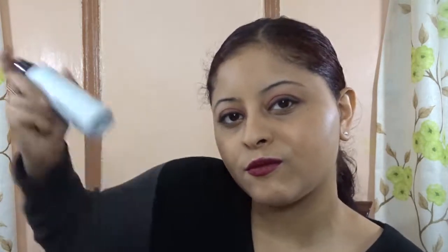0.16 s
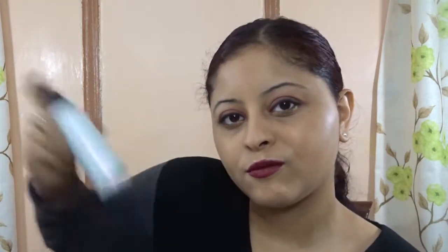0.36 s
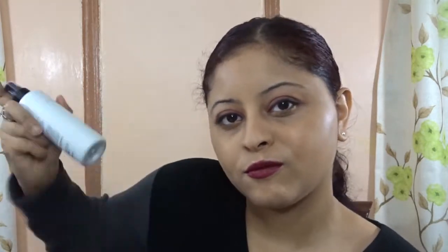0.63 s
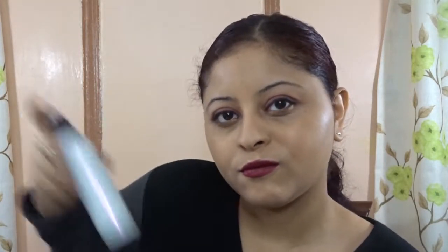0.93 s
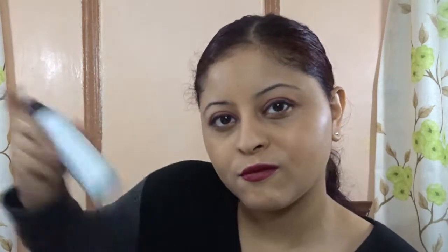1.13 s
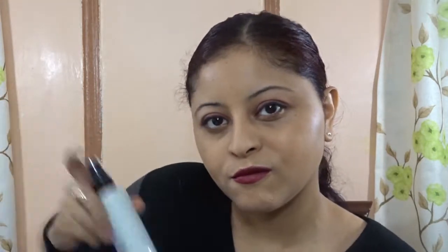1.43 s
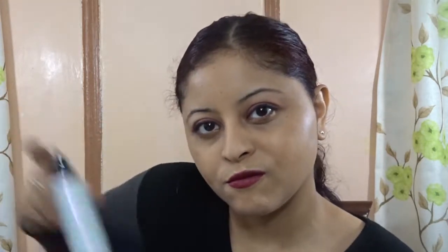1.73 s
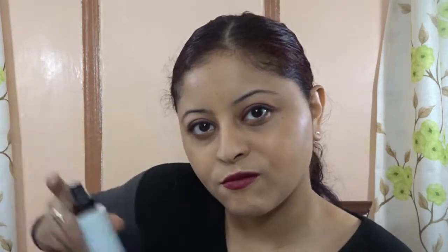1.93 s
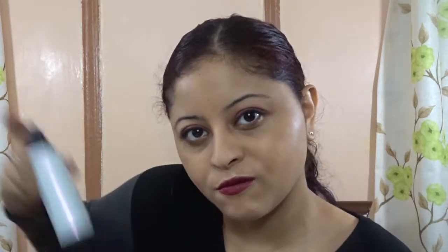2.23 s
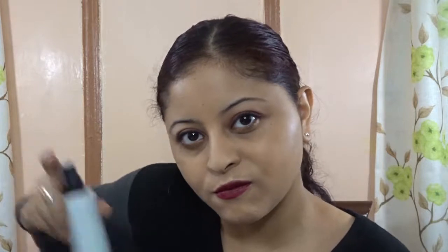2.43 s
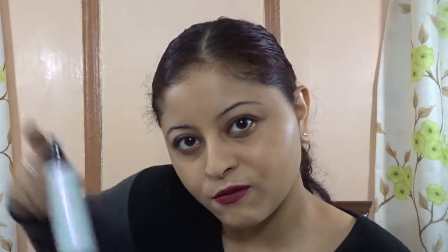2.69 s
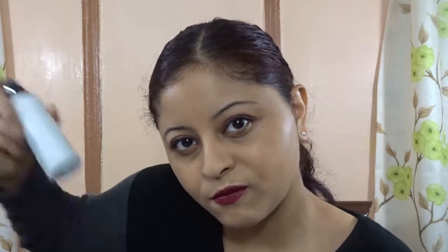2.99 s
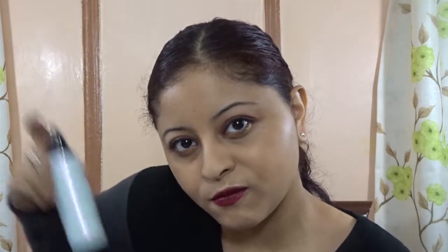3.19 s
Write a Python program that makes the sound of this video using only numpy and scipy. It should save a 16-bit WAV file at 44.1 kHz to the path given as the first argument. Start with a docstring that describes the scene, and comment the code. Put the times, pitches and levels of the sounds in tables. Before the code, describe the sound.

A plastic bottle is shaken hard from 0 to about 3.3 seconds. Its mixing ball gives dry, hollow, bright clacks, little bass, with light ticking bounces between. Early knocks are irregular, with a strong one near 0.16; from about 1 second, pairs of strokes run at roughly eight knocks per second, with a brief thinner gap around 2.25-2.5. Close, loud stereo; small-room echoes over faint hum and hiss.

```python
"""A soft low hum and hiss fill the room from start to end: shaped noise whose level wanders in patches.
Over it a plastic spray bottle is shaken hard: its mixing ball knocks at each end of the stroke
and bounces lightly between. Every contact rings the short modes of the bottle, as fading sines.
Bright echoes from near hard surfaces follow each one, then the tail of a small room, made of noise.
Last, a fast limiter holds the highest peaks and the top of the treble is rolled off."""
import sys
import numpy as np
from scipy import signal
from scipy.fft import rfft, irfft, next_fast_len
from scipy.io import wavfile
from scipy.ndimage import uniform_filter1d, minimum_filter1d

SR = 44100
rng = np.random.default_rng(int(sys.argv[2]) if len(sys.argv) > 2 else 0)


def to_wav(s):
    """Save 16-bit WAV."""
    ch = np.atleast_2d(s).T  # columns
    pcm = np.round(np.clip(ch, -1, 1) * 32767)  # PCM
    wavfile.write(sys.argv[1], SR, pcm.astype(np.int16))


N = 147735
SIZE = 16384  # samples in the transform of one knock
RING_SIZE = SIZE // 8  # samples of ringing
TAIL_SIZE = SIZE - RING_SIZE  # samples of room tail


def amp(db):
    """Turn decibels into a factor on the amplitude."""
    return 10 ** (np.asarray(db) / 20)


def along(points, hz):
    """Read a curve of (frequency [Hz], value) points on a log frequency axis."""
    point_hz, value = np.transpose(points)
    return np.interp(np.log(hz + 1), np.log(point_hz + 1), value)


def pair(mid, side, alike, hz):
    """Mix two unrelated spectra into a left and a right one that are as alike as asked."""
    turn = np.arccos(np.clip(along(alike, hz), -1, 1)) / 2
    shared = np.cos(turn) * mid
    opposed = np.sin(turn) * side
    return np.stack([shared + opposed, shared - opposed])


# Colour of the hum and hiss: (frequency [Hz], relative level [dB per Hz])
HUM_AND_HISS_COLOUR = [(25, -12), (44, -6), (80, -8.5), (140, 0.5), (190, -5.5), (400, -4), (1000, -13),
                       (2500, -14), (8000, -17), (16000, -30)]
# How alike the hum and hiss are left and right: (frequency [Hz], likeness [1 = the same])
HUM_AND_HISS_ALIKE = [(100, 1), (400, 0.7), (4000, 0.069)]
HUM_AND_HISS_DB, PATCHY_DB = -50, 1.5  # overall RMS level; spread of the patches


def hum_and_hiss():
    """Steady noise of the room: coloured noise whose level wanders in patches of time and pitch."""
    size = next_fast_len(N)
    hz = np.fft.rfftfreq(size, 1 / SR)
    grid = signal.stft(rng.standard_normal((2, size + SIZE)), nperseg=2048)[2]
    patches = rng.standard_normal(grid.shape[1:])
    patches = uniform_filter1d(patches, size=3, axis=0)  # smooth over pitch
    patches = uniform_filter1d(patches, size=9, axis=1)  # smooth over time
    patchy = signal.istft(grid * amp(PATCHY_DB * patches / patches.std()), nperseg=2048)[1]
    mid, side = rfft(patchy[:, :size]) * amp(along(HUM_AND_HISS_COLOUR, hz))
    noise = irfft(pair(mid, side, HUM_AND_HISS_ALIKE, hz), size)[:, :N]
    return amp(HUM_AND_HISS_DB) * noise / np.sqrt(np.mean(noise ** 2))


# Hard knocks of the ball, and how strongly each drives the groups of bottle modes:
# (time [s], body pitch [Hz], body level [dB], wall level [dB], neck level [dB],
#  click level [dB], base level [dB])
KNOCKS = [(.0055, 2363, -6.5, -21.5, -13.5, -15, -33.5), (.0753, 2160, -7.5, -18.5, -26, -19, -31),
          (.0854, 3180, -22, -18.5, -7.5, -14.5, -30), (.1588, 2620, 5.5, -4.5, -2.5, -0.5, -38),
          (.4064, 2547, 1.5, -11, -5.5, -7.5, -52), (.6204, 2624, -3, -9.5, -5.5, -7, -31.5),
          (.734, 2444, -23, -10.5, -1, -4.5, -25.5), (.8201, 2490, -1, -11.5, -5.5, -4, -37),
          (1.0024, 2530, -5, -26, -10.5, -9.5, -29), (1.078, 2570, 2.5, -9, -7, -4, -33),
          (1.217, 2440, -6.5, -14.5, -9, -5.5, -29.5), (1.301, 2560, 2.5, -13, -8.5, -6.5, -29),
          (1.43, 3080, -23, -14, -4, -5, -25.5), (1.52, 2520, 2, -14, -5.5, -7.5, -55),
          (1.6944, 2562, -13, -16, -22, -27.5, -54), (1.7791, 2590, 1.5, -10, -6, -5.5, -30.5),
          (1.9131, 2530, -5.5, -13, -2, -13, -33), (1.995, 2630, 1, -8, -8, -2.5, -40.5),
          (2.146, 2420, -4, -10.5, -10, -5, -30), (2.2378, 2616, -1, -8, -4.5, -2.5, -24),
          (2.5126, 2630, -3.5, -10.5, -10, -5, -29), (2.6567, 2950, -8, -17.5, -25, -7, -26),
          (2.7438, 2566, 0, -11.5, -4.5, -7.5, -32), (2.8991, 2670, -7.5, -16.5, -20, -10.5, -31),
          (2.9874, 2572, 0, -9.5, -12, -3, -28.5), (3.1375, 2310, -8, -12.5, -9, -4.5, -20.5),
          (3.2244, 2617, 0.5, -11, -8.5, -3, -28)]
# Light bounces of the ball along the wall:
# (time [s], level [dB], pitch [Hz], treble over the level [dB])
BOUNCES = [(0.0343, -10, 5200, -6), (0.1964, -7.5, 2600, -11), (0.3247, -10.5, 5400, -11),
           (0.3795, -12, 2420, -23), (0.4499, -9, 2470, -4.5), (0.4664, -13, 2450, -4),
           (0.7776, -6, 3260, -13), (0.8594, -5.5, 2640, -8.5), (0.9852, -11.5, 2340, -27),
           (1.0595, -12, 2460, -5.5), (1.3184, -6.5, 2640, -6.5), (1.3644, -16.5, 2580, -6),
           (1.482, -9, 3350, -8), (1.5668, -7, 2720, -11), (1.8547, -7.5, 4020, -7.5),
           (2.0567, -7.5, 2800, -6), (2.3725, -13, 3060, -19), (2.4009, -25, 3240, -12),
           (2.4224, -12.5, 5700, -11), (2.4798, -11, 4600, -14), (2.5621, -8, 2610, -10.5),
           (2.7102, -7.5, 5350, -8), (3.0659, -12, 5560, -7), (3.1128, -13.5, 4580, -27),
           (3.1544, -8, 5810, -8), (3.1914, -14, 4930, -14), (3.3089, -10.5, 2600, -9.5)]
BOUNCE_WALL_DB, BOUNCE_BASE_DB = -14.5, -27  # over the level of the bounce
BOUNCE_CLICK_DB = -8  # over the treble of the bounce


def ball_contacts():
    """Knocks and bounces as one list; a bounce sounds its own pitch in place of the body."""
    time, level, hz, treble = np.transpose(BOUNCES)
    wall = level + BOUNCE_WALL_DB
    neck = level + treble
    click = neck + BOUNCE_CLICK_DB
    base = level + BOUNCE_BASE_DB
    bounces = np.transpose([time, hz, level, wall, neck, click, base])
    return np.vstack([KNOCKS, bounces])


# Modes of the bottle, in four groups (wall, neck, click, base): (pitch [Hz], relative level [dB])
BOTTLE_MODES = [
    [(2065, 2.5), (3420, 9), (3990, 14), (1575, -14.5)],
    [(5590, 11), (4727, 5)],
    [(6650, 8), (7370, 7), (8150, 5), (10140, -3.5), (11400, -17.5), (14500, -28)],
    [(780, -3), (1110, 0)],
]
# The next three lists hold one value for the body, then one for each group of modes.
# How long a mode rings: (time to fall 60 dB [cycles])
RING_CYCLES = [44, 13, 26, 26, 24]
# How gently a mode starts: (time constant of the rise [cycles])
ATTACK_CYCLES = [1.62, 0.59, 1.055, 0.59, 0.76]
# How much the pitch varies from hit to hit: (spread [share of the pitch])
PITCH_SCATTER = [.006, .06, .04, .04, .015]
LEVEL_SCATTER_DB = 5  # spread from hit to hit, for the weaker modes above the base group
RING_SHRINKS, SHORTEST = .7, .28  # a weaker body rings shorter: dB of cycles per dB; least share


def bottle_rings(contacts):
    """Each mode is a sine that rises fast and dies away; pitch and level vary with the spot hit."""
    group = np.repeat(np.arange(len(BOTTLE_MODES) + 1), [1, *map(len, BOTTLE_MODES)])
    is_body = group == 0
    # the body comes first; its 0 Hz is filled in from each contact
    mode_hz, mode_db = np.transpose(sum(BOTTLE_MODES, [(0, 0.035)]))
    chance = rng.standard_normal((len(contacts), 2, len(mode_hz)))

    pitch = mode_hz + is_body * contacts[:, 1:2]
    pitch = pitch * (1 + np.take(PITCH_SCATTER, group) * chance[:, 0])
    pitch = pitch[..., None]  # room for the time axis
    varies = (mode_db < 5) * (mode_hz > 1500)
    level = contacts[:, 2 + group] + mode_db + LEVEL_SCATTER_DB * chance[:, 1] * varies

    shorter = np.clip(amp(RING_SHRINKS * level), SHORTEST, 1) ** is_body  # 1 for all but the body
    cycles = np.take(RING_CYCLES, group) * shorter
    t = np.arange(RING_SIZE) / SR
    fade = amp(level[..., None] - 60 * t * pitch / cycles[..., None])
    rise = (1 - np.exp(-t * pitch / np.take(ATTACK_CYCLES, group)[:, None])) ** 2
    return fade * rise * np.sin(2 * np.pi * pitch * t)


# Echoes from near hard surfaces: (delay [ms], left level [dB], right level [dB])
ECHOES = [(3.8, -10.5, -17), (6.9, -14, -5), (8.4, -15.5, -14)]
# Colour of these echoes: (frequency [Hz], gain [dB])
ECHO_COLOUR = [(1000, -1.5), (3000, -6.5), (6000, -4), (12000, 9)]
ECHO_SCATTER_DB, ECHO_SCATTER_MS = 2, .08  # spread from knock to knock
LEFT_LEADS_S = .00003  # the straight sound comes to the left first


def straight_and_echoes(count, hz):
    """The straight path, then a few reflections off near surfaces that shift a little each time."""
    lead = np.array([.5, -.5])[:, None, None] * LEFT_LEADS_S
    straight = np.exp(2j * np.pi * hz * lead)
    delay_ms, *sides_db = np.transpose(ECHOES)
    chance = rng.standard_normal((count, 3, len(delay_ms)))
    late = np.round((delay_ms + ECHO_SCATTER_MS * chance[:, 0]) * SR / 1000).astype(int)
    echoes = np.zeros((2, count, SIZE))
    for side in (0, 1):
        level = sides_db[side] + ECHO_SCATTER_DB * chance[:, 1 + side]
        echoes[side, np.arange(count)[:, None], late] = amp(level)
    return straight + rfft(echoes) * amp(along(ECHO_COLOUR, hz))


# Tail of the small room:
# (frequency [Hz], time to fall 60 dB [s], colour [dB], left-right likeness [1 = the same])
ROOM = [(550, 0.12, 15, 0.96), (1440, 0.37, -5, 0.48), (2800, 0.23, -2.5, 0.63), (6480, 0.24, -7, 0.043),
        (16400, 0.21, 8, 0.15)]
ROOM_RISE_S = .005
ROOM_GRAIN_DB, GRAIN_FADE_S = 3, 0.096  # the early tail is made of separate reflections
ROOM_PAN_DB = -1.2  # left over right


def room_tail(count, hz):
    """Fresh noise for each knock, grainy at first, that dies away at its own rate in each band."""
    t60, colour, alike = (np.array(ROOM)[:, [0, k]] for k in (1, 2, 3))
    age = np.arange(TAIL_SIZE) / SR
    grain_db = ROOM_GRAIN_DB * np.exp(-age / GRAIN_FADE_S)
    grain = amp(grain_db * rng.standard_normal((count, 1, len(age))))
    grain = grain / np.sqrt(uniform_filter1d(np.mean(grain ** 2, 0), size=256))  # even power
    noise = grain * rng.standard_normal((count, 2, len(age)))

    f, t, grid = signal.stft(noise, SR, nperseg=128)
    decay = amp(-60 * t / along(t60, f)[:, None])
    tail = signal.istft(grid * decay, SR, nperseg=128)[1]
    tail_age = np.arange(tail.shape[-1]) / SR
    tail = tail * (1 - np.exp(-(tail_age / ROOM_RISE_S) ** 2))
    tail = rfft(tail / np.sqrt(np.mean(np.sum(tail ** 2, -1))), SIZE)

    pan_db = ROOM_PAN_DB * np.array([.5, -.5])[:, None, None]
    return pair(tail[:, 0], tail[:, 1], alike, hz) * amp(along(colour, hz) + pan_db)


LOW_CUT_HZ = 1150


def rattle():
    """Ring, echo and tail of every contact; the tail takes the summed power of the modes,
    as the walls hear the bottle from all sides."""
    hz = np.fft.rfftfreq(SIZE, 1 / SR)
    contacts = ball_contacts()
    modes = bottle_rings(contacts)
    power = np.sum(np.abs(rfft(modes)) ** 2, 1)
    ring_hz = np.fft.rfftfreq(RING_SIZE, 1 / SR)
    all_sides = np.array([np.interp(hz, ring_hz, np.sqrt(p)) for p in power])

    early = rfft(modes.sum(1), SIZE) * straight_and_echoes(len(contacts), hz)
    late = all_sides * room_tail(len(contacts), hz)
    small = (1j * hz / (LOW_CUT_HZ + 1j * hz)) ** 2  # a small object radiates little bass
    heard = irfft(small * (early + late), SIZE)[..., :TAIL_SIZE]

    out = np.zeros((2, N + SIZE))
    for k, contact in enumerate(contacts):
        start = round(contact[0] * SR)
        out[:, start:start + TAIL_SIZE] += heard[:, k]
    return out[:, :N]


def scene():
    """The hum and hiss of the room with the rattle of the bottle over it."""
    return hum_and_hiss() + rattle()


PEAK, HOLD = .98, 96  # limiter: highest peak; hold [samples]
TOP_HZ, TOP_SLOPE_DB_PER_HZ = 15700, .035


def record(dry):
    """A fast limiter turns the peaks down; then the response falls steeply above the band limit."""
    gain = PEAK / np.maximum(np.abs(dry), PEAK)
    gain = uniform_filter1d(minimum_filter1d(gain, HOLD), HOLD // 2)
    size = next_fast_len(N + SR // 10)
    over_hz = np.clip(np.fft.rfftfreq(size, 1 / SR) - TOP_HZ, 0, None)
    return irfft(rfft(dry * gain, size) * amp(-TOP_SLOPE_DB_PER_HZ * over_hz), size)[:, :N]


dry = scene()
out = record(dry)
to_wav(out)
```